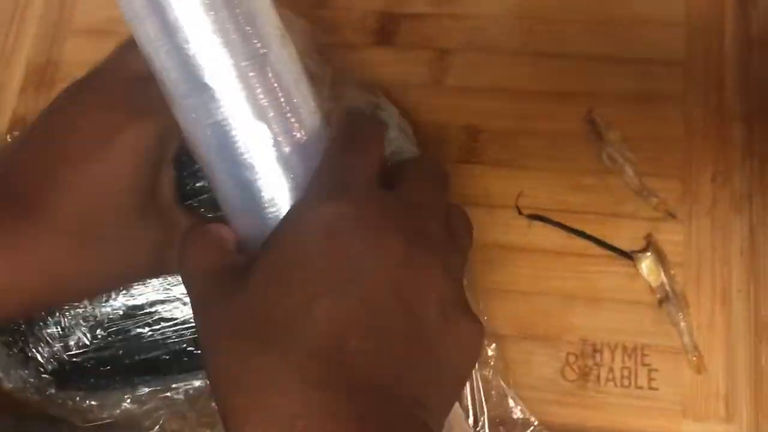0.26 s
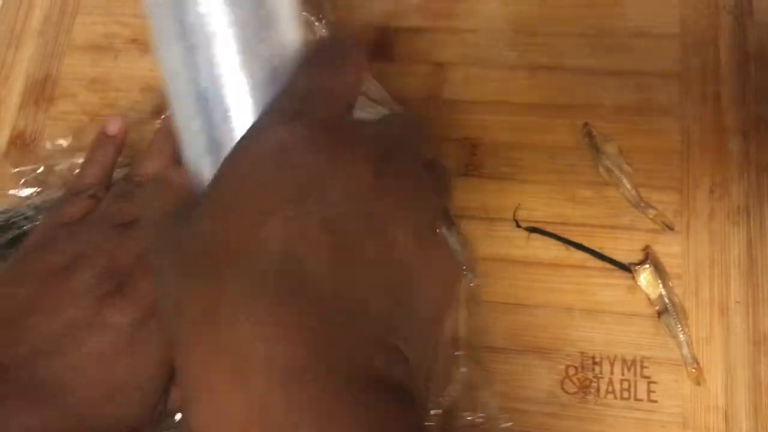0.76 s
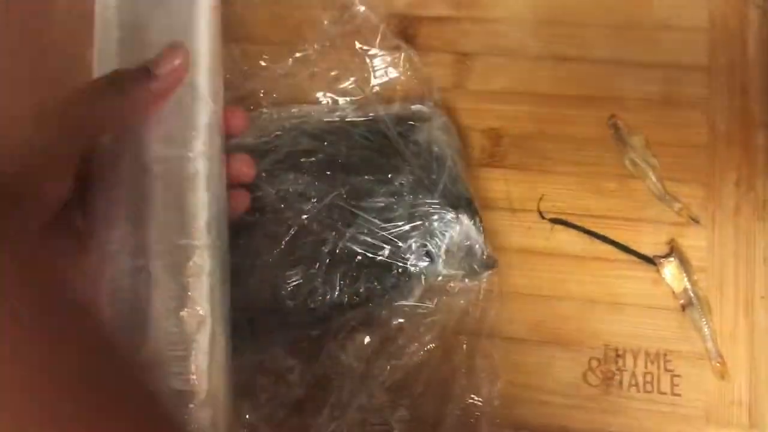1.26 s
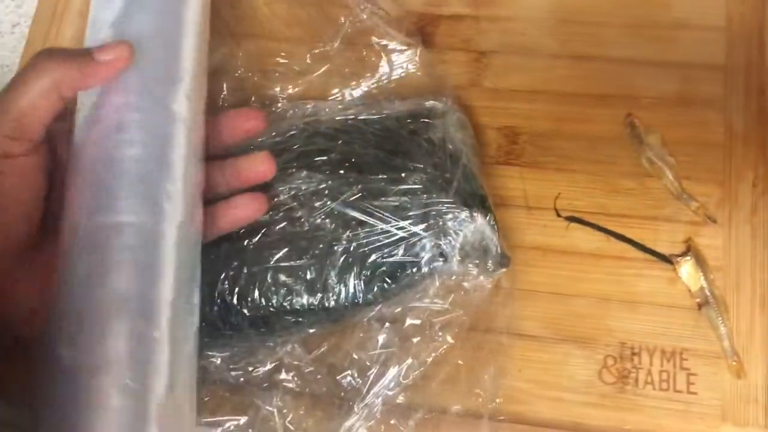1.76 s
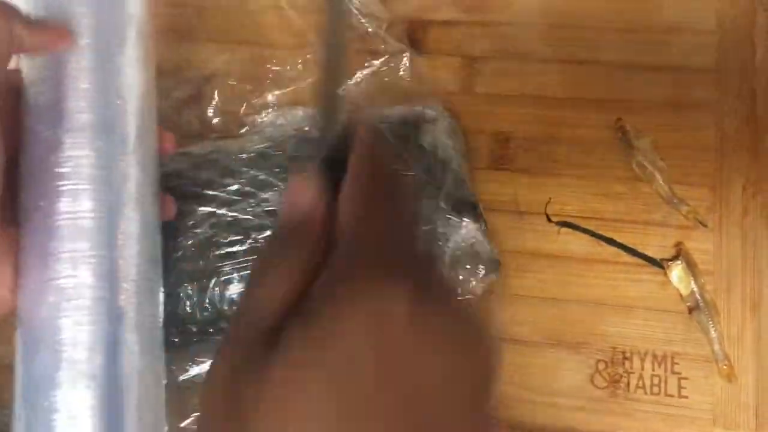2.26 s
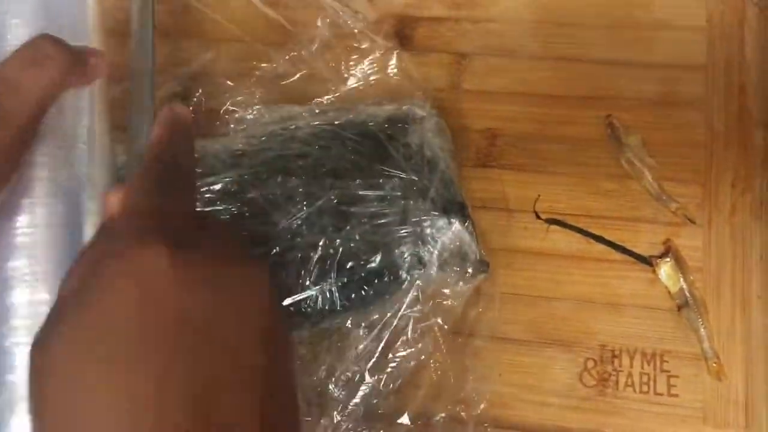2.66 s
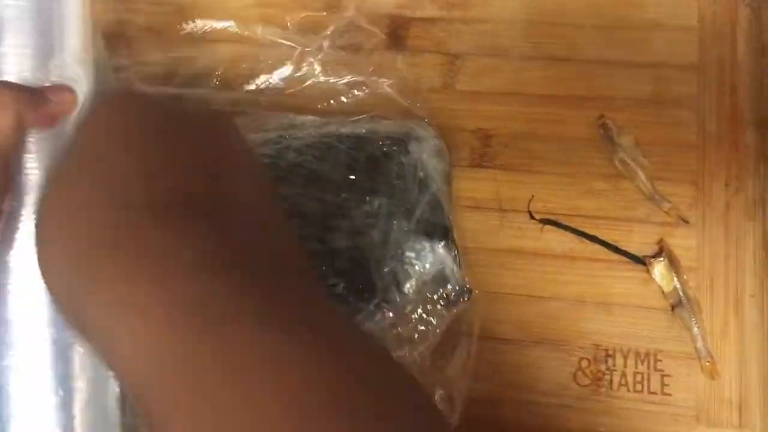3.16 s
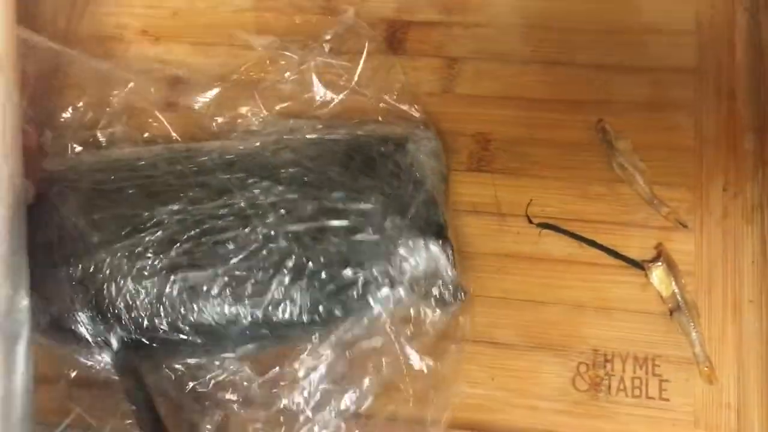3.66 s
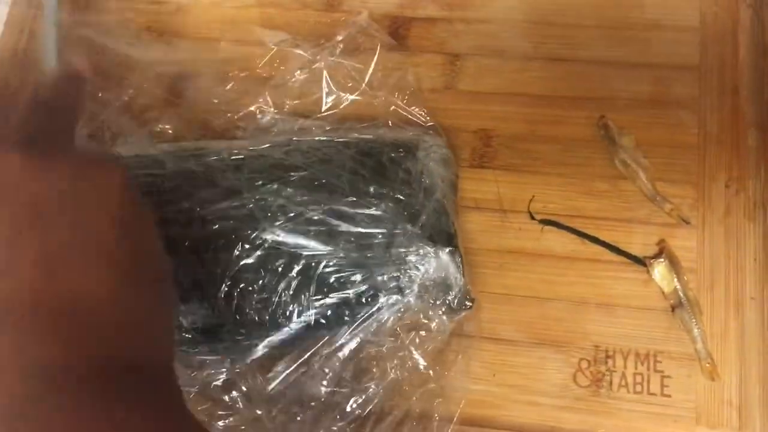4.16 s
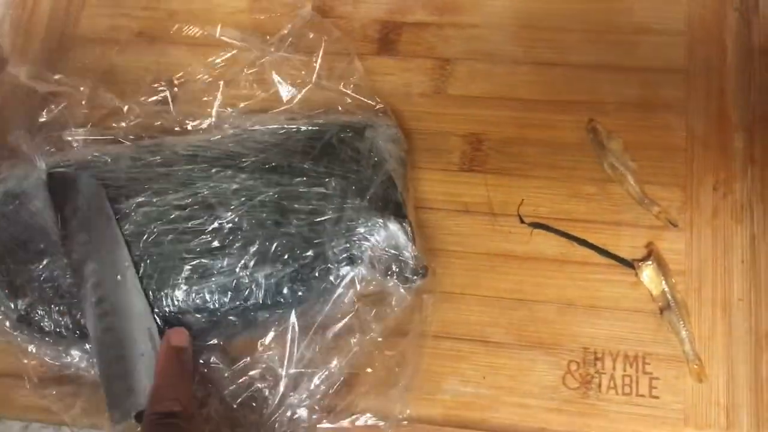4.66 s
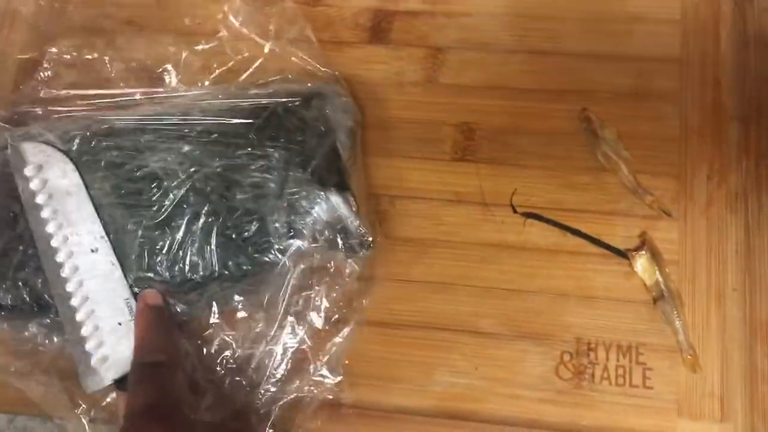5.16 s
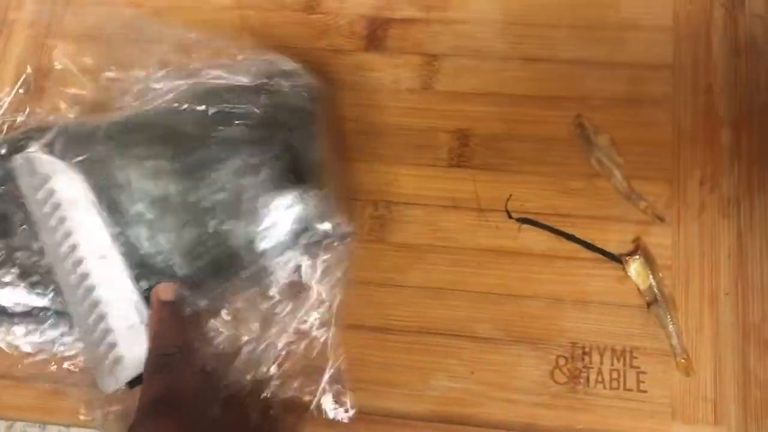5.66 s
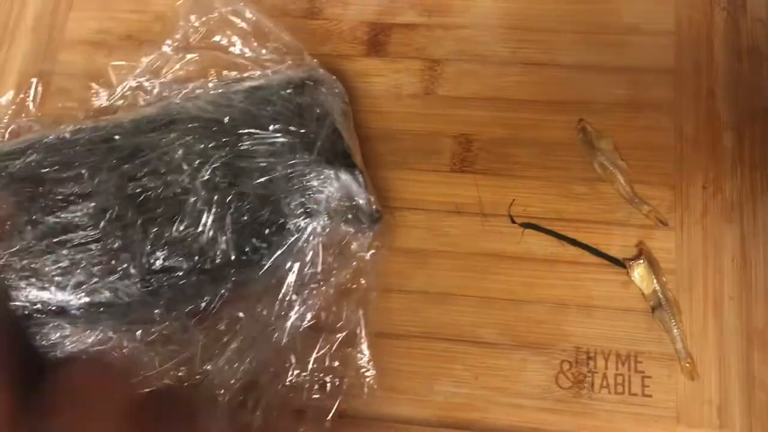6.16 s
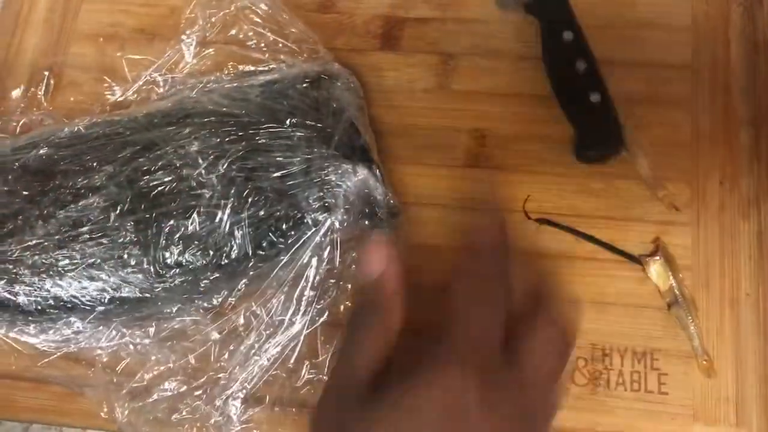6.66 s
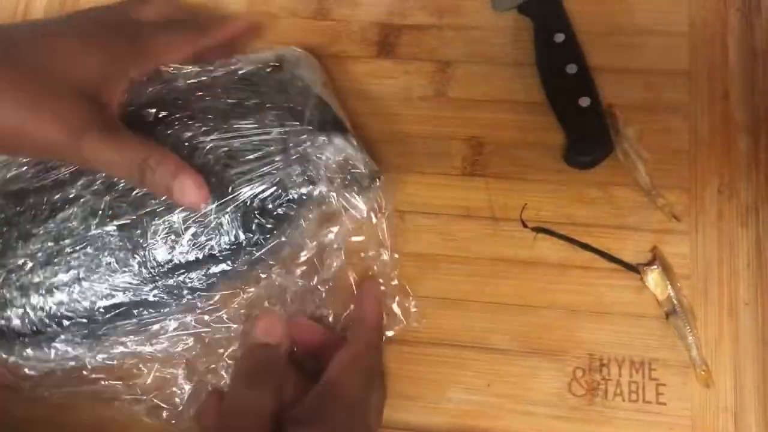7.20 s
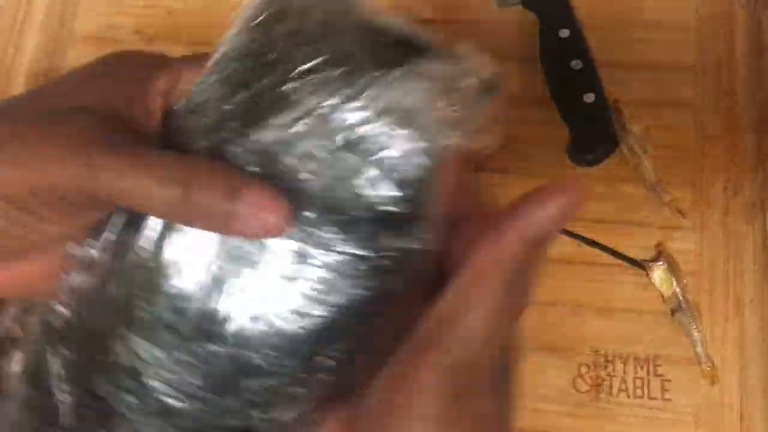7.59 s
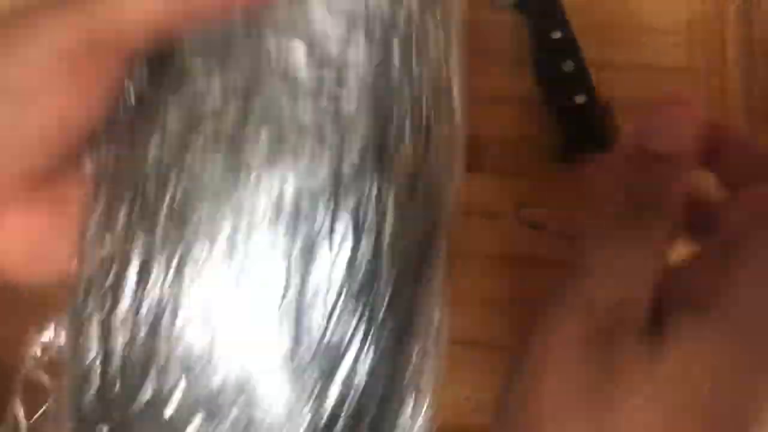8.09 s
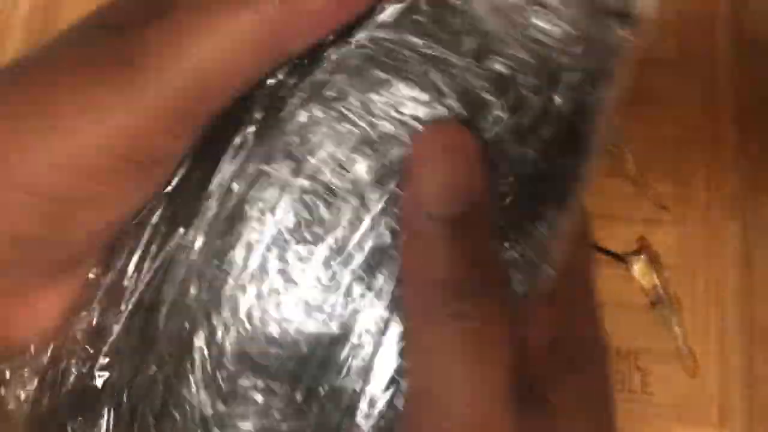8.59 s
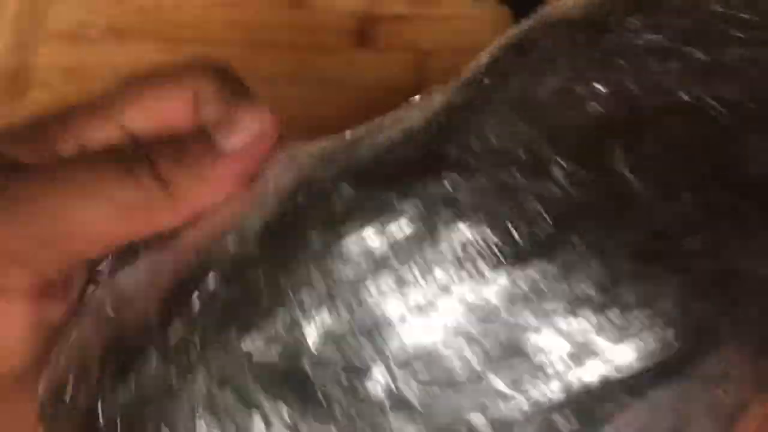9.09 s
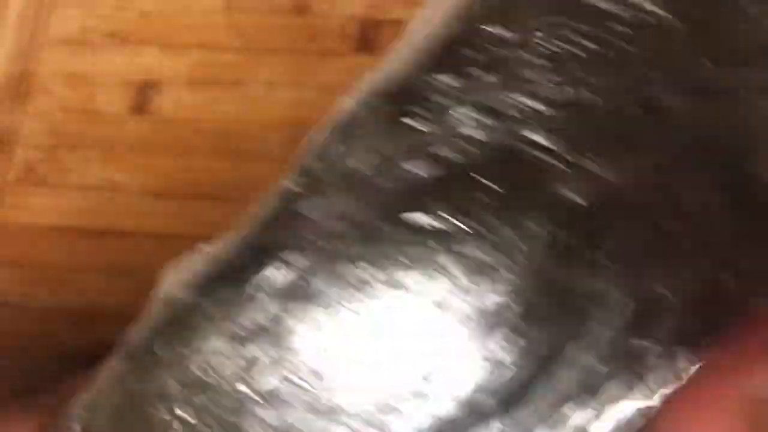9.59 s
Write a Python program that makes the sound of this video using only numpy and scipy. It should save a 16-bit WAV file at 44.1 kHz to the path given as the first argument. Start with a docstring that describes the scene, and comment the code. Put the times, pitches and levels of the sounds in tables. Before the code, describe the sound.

A quiet small kitchen, recorded close, with a faint low appliance hum throughout. From 0 to 1.4 s cling film rustles softly in short bursts with small dull pops, a tiny creak and a faint low thump. Around 1.6-1.8 s a blade is picked up: light board taps and a thin, brief metallic ring and scrape. Soft crinkles follow until 3.1 s, when the film crackles brightly, with sharp loud snaps at about 3.3 s. Rustling continues; at 4.9 s and 5.3 s heavy low thumps hit the wooden board amid hard snaps. Another thump comes at 6.2 s, then the knife clatters down in a run of woody, metallic knocks from 6.4 to 6.7 s, trailing off lightly. From 7 s to the end near 9.8 s the parcel is handled: continuous uneven crackling, scattered snaps, one strong near 7.9 s, and slight film creaks around 9.1-9.3 s.

```python
"""Quiet kitchen: cling film is pulled off a roll, wrapped round a parcel on a wooden board and cut with a knife.
Film: dense random clicks rustle under hand gestures; sharp snaps are decaying noise, creaks narrow noise swells.
Parcel and knife thump and knock: contact pulses ring the modes of board and handle.
Picked up, the blade rings as gritty friction drives its steel modes; it clatters when put down.
Appliance hum is coloured noise; a short noise tail gives the room echo."""
import sys
import numpy as np
from scipy import signal
from scipy.io import wavfile
from scipy.ndimage import uniform_filter1d

SR = 44100
rng = np.random.default_rng(int(sys.argv[2]) if len(sys.argv) > 2 else 0)


def bounce(signal):
    """Save signal as a 16-bit WAV file at the path given by the first command-line argument."""
    frames = np.transpose(np.atleast_2d(signal))
    limited = np.clip(frames, -1, 1)
    pcm = np.round(limited * 32767).astype(np.int16)
    wavfile.write(sys.argv[1], SR, pcm)


N = 433942


def from_db(db):
    """Amplitude gain of a level in dB."""
    return 10 ** (np.asarray(db) / 20)


def rms_one(x):
    """Scale to rms 1."""
    return x / np.sqrt(np.mean(x ** 2) + 1e-20)


def in_time(rows):
    """Interpolate every column of a (time_s, ...) curve at each sample."""
    time_s, *columns = np.transpose(rows)
    return [np.interp(np.arange(N) / SR, time_s, column) for column in columns]


def drift(rate_hz):
    """Slow random curve of rms 1: noise through a double pole, computed every 40 samples."""
    pole = np.exp(-2 * np.pi * rate_hz * 40 / SR)
    noise = rng.standard_normal(N // 40 + 2002)
    slow = signal.lfilter([1], [1, -2 * pole, pole ** 2], noise)[2000:]   # settled part
    return np.interp(np.arange(N) / 40, np.arange(len(slow)), rms_one(slow))


def band(x, low_hz, high_hz):
    """Butterworth band-pass."""
    sos = signal.butter(2, [low_hz, min(high_hz, .47 * SR)], "band", fs=SR, output="sos")
    return signal.sosfilt(sos, x + 1e-18)


def coloured(pair, spectrum, patchy_db):
    """Third-octave bands taken in turn from two sources, each flickering in level; rms 1."""
    hz, level_db = np.transpose(spectrum)
    edges_hz = hz[0] * 2 ** np.arange(0, np.log2(18000 / hz[0]), 1 / 3)
    out = 0
    for k, (low_hz, high_hz) in enumerate(zip(edges_hz, edges_hz[1:])):
        band_db = np.interp(np.log(low_hz * high_hz) / 2, np.log(hz), level_db)
        gain = from_db(band_db + patchy_db * drift(10.5))
        out = out + gain * band(pair[k % 2], low_hz, high_hz)
    return rms_one(out)


def ring(clicks, hz, t60_s):
    """Two-pole resonance: a unit click starts a decaying sine of height 1."""
    pole, w = from_db(-60 / (t60_s * SR)), 2 * np.pi * hz / SR
    return signal.lfilter([0, np.sin(w)], [1, -2 * pole * np.cos(w), pole ** 2], clicks + 1e-18)


def grains(per_s, spread_db, clump_db):
    """Random clicks of very unequal size and either sign, at a drifting rate that clumps them."""
    size_db = spread_db * np.minimum(rng.exponential(1, N), 3.5)
    sizes = from_db(size_db) * rng.choice([-1, 1], N)
    chance = per_s * from_db(clump_db * drift(25)) / SR
    return sizes * (rng.random(N) < chance)


def gesture(full_s, swell_s, hold_s, level_db, fade_db_per_s):
    """Gain of one movement: 15 dB even rise over swell_s, hold, even fade in dB."""
    t = np.arange(N) / SR - full_s
    rise_db = 15 * np.minimum(t, 0) / swell_s
    fade_db = fade_db_per_s * np.maximum(t - hold_s, 0)
    return from_db(level_db + rise_db - fade_db)


def hum():
    """Appliance hum: noise shaped by a mostly low spectrum whose bands waver."""
    # hum spectrum: hz, relative_db_per_hz
    hum_spectrum = [(15, -59), (25, -7), (49, 7), (80, -4), (117, -0.5), (170, -2), (210, -10.5),
                    (305, 1.5), (450, -22.5), (796, -10.5), (863, -23.5), (1190, -20), (2150, -23),
                    (2700, -30.5), (9070, -32.5), (16000, -44)]
    return from_db(-55) * coloured(rng.standard_normal((2, N)), hum_spectrum, patchy_db=3.0)


def rustle():
    """Clinging layers part in tiny slips and fewer dry ticks; larger folds buckle with a duller sound."""
    # pulls, presses, folds of the hands: full_s, swell_s, hold_s, crackle_db
    hand_moves = [(0.0, .05, 0.0059, -52), (0.205, 0.17, 0.043, -50.5), (0.324, 0.019, 0.015, -56.5),
                  (0.498, 0.084, 0.015, -51.5), (0.575, 0.025, 0.041, -59.5), (0.796, 0.11, 0.037, -55),
                  (0.917, 0.014, 0.014, -55.5), (1.072, 0.18, 0.024, -50), (1.457, 0.086, 0.0089, -62),
                  (1.59, 0.13, 0.047, -63), (1.732, 0.011, .01, -56), (1.849, 0.012, 0.011, -52.5),
                  (1.904, 0.015, 0.0072, -56), (2.04, 0.042, 0.025, -57.5), (2.15, 0.05, 0.028, -60.5),
                  (2.381, 0.069, 0.014, -59), (2.91, 0.13, 0.018, -59.5), (3.131, 0.18, 0.057, -47),
                  (3.249, 0.034, 0.086, -45), (3.438, 0.093, 0.16, -54), (3.746, 0.1, 0.017, -48.5),
                  (3.964, 0.032, 0.021, -61), (4.172, 0.036, 0.15, -53.5), (4.35, 0.051, 0.038, -46.5),
                  (4.482, 0.11, 0.015, -57), (4.562, 0.022, 0.012, -48), (4.75, 0.21, 0.06, -55),
                  (4.89, 0.039, 0.053, -41.5), (5.136, 0.012, 0.015, -60), (5.248, 0.17, 0.057, -52),
                  (5.28, 0.029, 0.21, -55), (5.648, 0.0051, 0.017, -47.5), (5.893, 0.099, 0.031, -50.5),
                  (6.21, 0.0064, 0.038, -49), (6.438, .02, 0.099, -55.5), (6.621, 0.011, 0.0088, -54.5),
                  (6.959, 0.042, 0.22, -50.5), (7.322, 0.12, 0.054, -47.5), (7.465, 0.097, 0.1, -46.5),
                  (7.658, 0.16, 0.096, -52), (7.815, 0.04, 0.082, -56.5), (8.004, 0.073, 0.028, -49.5),
                  (8.248, 0.013, 0.011, -48), (8.435, 0.12, 0.042, -50), (8.53, 0.018, 0.12, -49.5),
                  (8.981, 0.087, 0.014, -52), (9.064, 0.034, 0.017, -46.5), (9.267, 0.13, 0.011, -50.5),
                  (9.417, 0.018, 0.04, -55.5), (9.551, 0.025, 0.011, -53.5), (9.618, 0.038, 0.056, -53),
                  (9.747, 0.035, 0.015, -52)]
    # dullness of the handling, strongest while the knife is put down: time_s, folds_over_crackle_db
    dullness = [(0, -0.5), (.5, 1), (1.1, -2.5), (1.5, 4.5), (2.2, -1), (3.1, -5), (3.9, -4.5), (4.4, -2),
                (5.6, -5), (6.1, -1.5), (6.3, 8), (6.7, 15.5), (6.95, -4), (8.1, -4), (8.5, -4),
                (9.3, -8.5), (9.84, -6)]
    # crackle spectrum: hz, relative_db_per_hz
    crackle_spectrum = [(1060, -75), (1800, -6), (2060, -2), (6530, -1.5), (7490, -3.5), (13800, -6),
                        (16000, -11.5)]
    rest_db, settle_db_per_s = -78, 203   # faint creep; fade after a gesture
    power = sum(gesture(*row, settle_db_per_s) ** 2 for row in hand_moves)
    hands = np.sqrt(from_db(rest_db) ** 2 + power)
    folds_db, = in_time(dullness)
    surge = from_db(2.0 * drift(45))   # uneven pull

    slips = rms_one(grains(2500, spread_db=1.0, clump_db=7.0))
    clicks = grains(220, spread_db=5.5, clump_db=2.5)
    crease = rng.integers(0, 4, N)   # crease size sets the band of each tick
    ticks = 0
    for k in range(4):
        ticks = ticks + rms_one(band(clicks * (crease == k), 900 * 2 ** k, 3600 * 2 ** k))
    crackle = slips + .6 * rms_one(ticks)
    bright = coloured(crackle + .22 * rng.standard_normal((2, N)), crackle_spectrum, patchy_db=.6)

    buckles = rms_one(grains(900, spread_db=2.0, clump_db=4.5))
    folds = rms_one(band(buckles + 0.54 * crackle, 330, 2210))
    return surge * hands * (bright + from_db(folds_db) * folds)


def snaps():
    """Film lets go or is struck: a brief crack, then the sheet shivers; both lower parts last longer."""
    # releases and strikes, wide creases sound dull: start_s, crack_drive_db, dull_over_crack_db
    releases = [(0.1146, -52, 22), (0.0683, -46.5, 11.5), (0.1862, -40, 13), (0.233, -43, 12),
                (0.2552, -36.5, 14.5), (.42, -47, 10), (0.4756, -42, 13), (.5109, -44, 12),
                (0.6669, -34, -2.5), (0.916, -39, 5), (0.9918, -36, 8.5), (1.24, -43, -14), (1.591, -45, 0),
                (1.734, -39.5, 10.5), (1.8305, -45.5, 2), (1.8537, -33.5, -11), (2.0322, -38.5, 6.5),
                (2.048, -33.5, -20), (2.562, -45, -9), (2.842, -45, -27), (3.1122, -29, -0.5),
                (3.1628, -31.5, -14), (3.2643, -18.5, -3.5), (3.275, -14.5, -6), (3.307, -45.5, 21.5),
                (3.334, -12.5, -2.5), (3.3753, -23, -9), (3.4362, -36.5, -4), (3.683, -35.5, -28),
                (3.957, -42.5, -18), (4.359, -35, 12), (4.4141, -25.5, 1.5), (4.4994, -36, 16),
                (4.579, -35, 10.5), (4.7143, -35, -21), (4.838, -26.5, 2.5), (4.8826, -26.5, 4),
                (4.8949, -16.5, 10), (4.8981, -31, 17), (4.9057, -14.5, 4), (4.9345, -12.5, -3),
                (4.9731, -20, 5.5), (5.1338, -30, -0.5), (5.2341, -28.5, 11), (5.3153, -13.5, 2),
                (5.3303, -16.5, 4.5), (5.3766, -25, -6), (5.6458, -20.5, -1.5), (6.421, -15.5, 2),
                (6.4442, -28, 8), (6.4729, -25.5, 3), (6.5089, -29.5, 22.5), (6.5336, -24.5, -13),
                (6.6163, -22, -2), (6.637, -36, -20), (6.674, -48, -20), (7.007, -31, -5.5),
                (7.054, -41, 1), (7.088, -35, -5), (7.4932, -31, -14), (7.528, -26.5, -18),
                (7.546, -28, -15), (7.553, -26, -3.5), (7.699, -41.5, 14), (7.864, -17, -5),
                (7.936, -41, -25), (7.951, -33, -25), (7.966, -35, -29), (8.2696, -23, -11),
                (8.3509, -32.5, 1), (8.402, -51.5, 22.5), (8.4583, -30.5, 0), (8.536, -27, 9),
                (9.229, -40, 15), (9.462, -26, 7), (9.6077, -40, -4)]
    deep_db, deep_follows = 2, 0.79   # deep drive over crack; share of dull_over_crack_db added
    t = np.arange(round(.12 * SR)) / SR
    shiver = rng.standard_normal((len(releases), len(t)))
    shiver *= rng.exponential(.7, shiver.shape)   # unequal small releases
    shiver = np.clip(shiver, -2, 2)
    shiver[:, 0] = 3 * np.sign(shiver[:, 0])   # first release: one clean jolt
    # crack, dull, deep: crack time constant s, shiver share, shiver t60 s
    decays = [(.0006, 0.44, 0.049), (.001, 0.55, 0.084), (.002, .25, .07)]
    shapes = [np.exp(-t / crack_s) + share * from_db(-60 * t / t60_s) for crack_s, share, t60_s in decays]

    parts = np.zeros((3, N + len(t)))
    for (start_s, crack_db, dull_db), noise in zip(releases, shiver):
        at = round(start_s * SR)
        over_crack_db = [0, dull_db, deep_db + deep_follows * dull_db]
        for part, over_db, shape in zip(parts, over_crack_db, shapes):
            part[at:at + len(t)] += from_db(crack_db + over_db) * shape * noise
    gentle = signal.butter(1, [1400, 6500], "band", fs=SR, output="sos")
    crack = signal.sosfilt(gentle, parts[0] + 1e-18)
    dull, deep = band(parts[1], 403, 2640), band(parts[2], 266, 780)
    return (crack + dull + deep)[:N]


def struck(pushes, modes, gain_db, spread_db, favour_db_per_octave, rattle_db, rattle_hz):
    """Each push drives each mode at a random strength, most near its favoured pitch; loose parts rattle."""
    out = np.zeros(N)
    chance = rng.standard_normal((len(pushes), len(modes)))
    for k, (hz, mode_db, t60_s) in enumerate(modes):
        force = np.zeros(N)
        sign = (-1) ** k   # neighbouring modes start in opposite senses
        for (start_s, drive_db, contact_s, favoured_hz), own in zip(pushes, chance[:, k]):
            # a soft, long contact spares the high modes
            bump = np.hanning(max(round(contact_s * SR), 1) + 2)[1:-1]
            away_db = favour_db_per_octave * abs(np.log2(hz / favoured_hz))
            push_db = drive_db + gain_db + mode_db - away_db + spread_db * own
            at = round(start_s * SR)
            force[at:at + len(bump)] += from_db(push_db) * sign * bump / bump.sum()
        out += ring(force, hz, t60_s)
    rattle = rms_one(band(band(rng.standard_normal(N), *rattle_hz), *rattle_hz))
    envelope = uniform_filter1d(abs(out), size=101, origin=50)   # mean of the latest 101 samples
    return out + from_db(rattle_db) * envelope * rattle


def board_thumps():
    """Weight landing on the board rings its low wooden modes; the spot favours one pitch."""
    # landings: start_s, drive_db, contact_s, favoured_hz
    landings = [(0.085, -52, 0.0059, 62), (0.49, -37, 0.0022, 110), (1.553, -38, .0007, 425),
                (1.59, -31, 0.0013, 210), (1.736, -37, 0.0033, 330), (4.42, -35, 0.003, 280),
                (4.497, -35, 0.0053, 200), (4.894, -20, 0.0028, 110), (4.906, -16.5, 0.0016, 280),
                (4.935, -21, 0.0024, 110), (4.977, -17.5, 0.0032, 110), (5.234, -28.5, 0.0017, 280),
                (5.315, -7, 0.0041, 79.3), (5.328, -11.5, 0.004, 110), (5.377, -26.5, 0.0032, 110),
                (6.211, -12.5, 0.0017, 129), (6.228, -14.5, 0.0028, 330), (6.248, -20.5, 0.00081, 636),
                (6.273, -21.5, 0.0021, 100), (6.295, -22, 0.0023, 250), (6.313, -23.5, 0.0027, 111),
                (6.422, -21.5, 0.0016, 172), (6.468, -33, 0.00027, 177.6), (8.637, -36.5, 0.003, 100)]
    # board modes: pitch_hz, relative_db, t60_s
    board_modes = [(62, -3, 0.11), (81, -7.5, 0.15), (113.3, -1.5, 0.14), (201, -9.5, 0.065),
                   (166, -7, 0.051), (240, -9, 0.11), (280, -10, 0.13), (334.4, -6.5, 0.16),
                   (435, -11, 0.078), (644, -12, 0.21), (880, -38, 0.058)]
    return struck(landings, board_modes, gain_db=-3.5, spread_db=2.0, favour_db_per_octave=4,
                  rattle_db=-17.5, rattle_hz=(550, 2700))


def creaks():
    """Stretched film slips over itself: friction noise swells through one resonance of the taut sheet."""
    # creaks: start_s, length_s, pitch_hz, level_db
    slip_events = [(0.15, 0.025, 1530, -43), (9.051, 0.046, 1800, -43.5), (9.272, 0.028, 1860, -41),
                   (9.052, 0.036, 830, -48.5), (9.287, 0.026, 940, -45.5), (7.17, .09, 1050, -50.5)]
    out = np.zeros(N)
    friction = rng.standard_normal((len(slip_events), SR // 10))
    for (start_s, length_s, hz, level_db), noise in zip(slip_events, friction):
        swell = np.hanning(round(length_s * SR))
        tone = rms_one(band(noise, 0.8 * hz, 1.3 * hz))[:len(swell)]
        at = round(start_s * SR)
        out[at:at + len(swell)] += from_db(level_db) * swell * tone
    return out


def blade_slides():
    """The blade slides in short jerks; gritty friction rings the narrow modes of the steel."""
    # jerks, one list per grip: full_s, swell_s, hold_s, friction_db
    grip_jerks = [
        [(1.624, .012, .006, -54.5), (1.645, .01, .005, -55), (1.661, .01, .008, -56)],
        [(1.736, 0.0028, 0.0069, -45), (1.759, .012, .006, -45.5)],
    ]
    # blade modes, one list per grip: pitch_hz, width_hz, relative_db
    grip_modes = [
        [(3590, 57, 0), (4600, 100, -6), (6030, 130, 2), (7200, 74, -1), (8800, 120, -1), (10200, 80, -1),
         (11600, 170, -4), (12500, 63, -6), (13500, 51, -10)],
        [(372, 22, 1), (2380, 94, 1), (2536, 63, -2), (3250, 83, -7.5), (5400, 210, -11), (7000, 120, -11),
         (9570, 96, -13), (11800, 44, -24), (14800, 54, -14)],
    ]
    out = np.zeros(N)
    for jerks, modes in zip(grip_jerks, grip_modes):
        grit = rms_one(grains(3000, spread_db=3.0, clump_db=2.0))
        friction = grit * sum(gesture(*jerk, fade_db_per_s=1200) for jerk in jerks)
        out += .5 * band(friction, 2300, 15000)   # the scrape itself
        total = np.sqrt(sum(from_db(mode_db) ** 2 for _, _, mode_db in modes))
        for hz, width_hz, mode_db in modes:
            even = np.sqrt(4 * np.pi * width_hz / SR)   # offsets the gain of narrow modes
            out += from_db(mode_db) / total * even * ring(friction, hz, 2.2 / width_hz)
    return out


def knife_knocks():
    """Handle and blade knock on the wood in short contacts that ring the knife's modes."""
    # knocks: start_s, drive_db, contact_s, favoured_hz
    contacts = [(6.213, -33, 0.00024, 1300), (6.422, -11, 0.00031, 1790), (6.445, -12.5, 0.00016, 1090),
                (6.4724, -9.5, .0001, 1500), (6.502, -15, 0.000078, 1530), (6.5088, -9, .0002, 1270),
                (6.58, -22, 0.00074, 900), (6.6155, -31, 0.00011, 3100), (6.623, -15.5, 0.00025, 2100),
                (6.642, -21, 0.00093, 1260), (6.658, -33, 0.00027, 2900), (6.673, -22, 0.00058, 900),
                (6.737, -29, 0.0008, 1200), (6.84, -30.5, .0008, 1000)]
    # knife modes: pitch_hz, relative_db, t60_s
    knife_modes = [(170, 9.5, 0.14), (706, -2.5, 0.044), (847, -6, 0.07), (1064, -2, 0.043),
                   (1250, 1.5, 0.038), (1510, -2, 0.016), (1640, -4.5, 0.062), (1910, 0, 0.035),
                   (2100, -1, 0.048), (2380, -1.5, 0.04), (2770, -8, 0.046), (3100, -4, .04),
                   (3576, 2.5, 0.042), (4620, -7, .045), (6070, -24, 0.088), (6860, -20, 0.089),
                   (8560, -20, .12)]
    return struck(contacts, knife_modes, gain_db=-11, spread_db=4, favour_db_per_octave=6,
                  rattle_db=-19, rattle_hz=(700, 3300))


def kitchen(x):
    """Diffuse echoes of a small hard room: a noise tail of unit energy, duller as it ages."""
    t60_s = 0.14   # low band; the high band dies 1.5 times as fast
    t = np.arange(round(.4 * SR)) / SR
    noise = rng.standard_normal(len(t))
    low = band(noise, 355, 3600) * from_db(-60 * t / t60_s)
    high = band(noise, 4500, 9200) * from_db(-90 * t / t60_s)
    tail = (low + high) * (t > .003)
    return signal.fftconvolve(x, tail / np.sqrt(np.sum(tail ** 2)))[:N]


def scene():
    """Film, board and knife close by, the room and its hum around them."""
    film = rustle() + snaps() + creaks()
    near = film + board_thumps() + blade_slides() + knife_knocks()
    echo = from_db(-18) * kitchen(near)
    return (near + echo + hum())[None]


def record(dry):
    """The microphone loses the deepest bass and dips a little near 10 kHz; the top is cut steeply."""
    x = signal.sosfilt(signal.butter(3, 45, "high", fs=SR, output="sos"), dry)
    x = x - .5 * band(x, 9950, 10570)
    return signal.sosfilt(signal.cheby2(14, 60, 16300, fs=SR, output="sos"), x)   # 60 dB down at 16.3 kHz


dry = scene()
out = record(dry)
bounce(out)
```